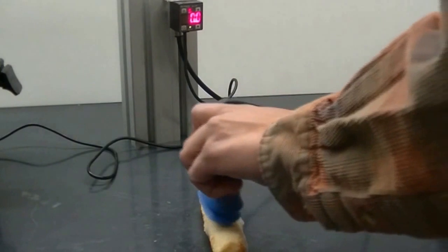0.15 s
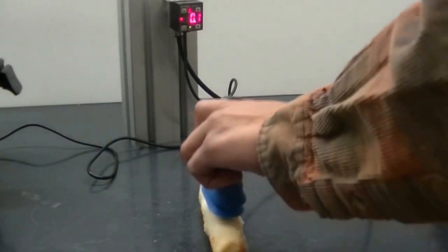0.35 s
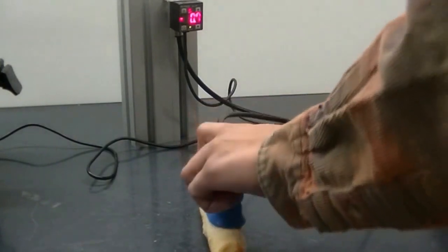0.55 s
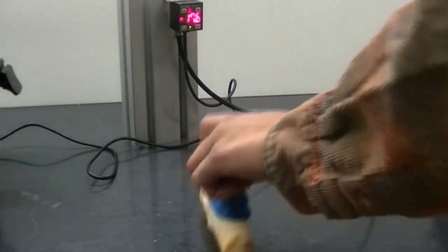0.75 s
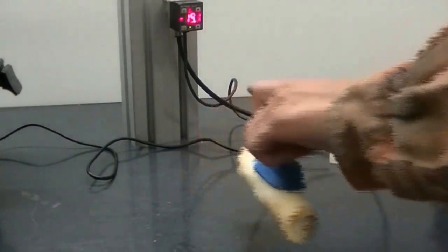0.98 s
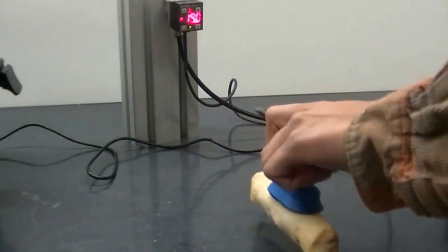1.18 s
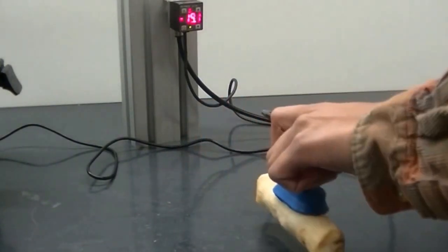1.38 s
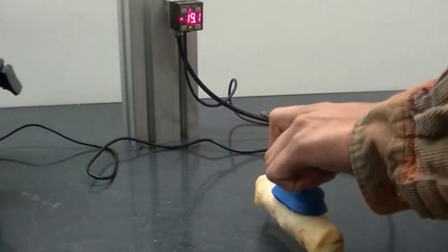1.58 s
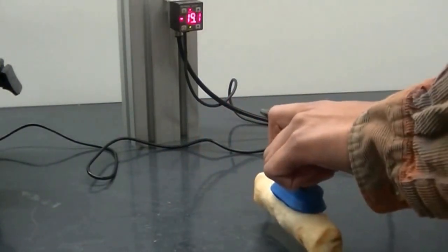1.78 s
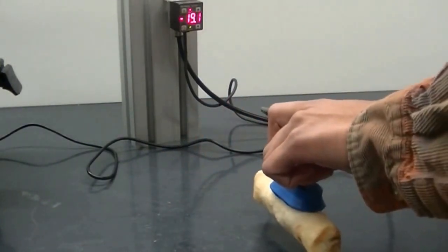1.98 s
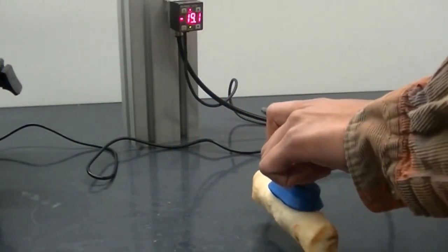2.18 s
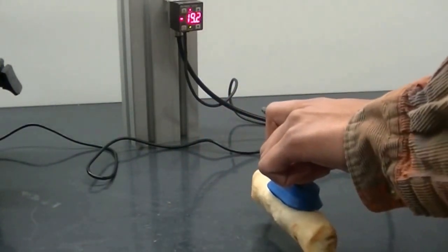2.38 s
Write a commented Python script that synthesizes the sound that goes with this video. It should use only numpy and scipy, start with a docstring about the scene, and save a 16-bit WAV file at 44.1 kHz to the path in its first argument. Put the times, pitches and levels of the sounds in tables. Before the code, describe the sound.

A loud hiss of compressed air from a vacuum ejector, heard close up. Faint electrical hum and ventilation come first; at about 0.25 seconds a valve snaps open and the bright hiss starts at once, covering the room. From 0.6 to 1.3 seconds its tone shifts as a suction cup grips and lifts food. It then holds steady, easing slightly, until the end at about 2.4 seconds.

```python
"""Mains hum and ventilation in a room, then a valve snaps open and a jet of compressed air hisses.
It is a vacuum ejector on a bench, close to a camera's stereo microphone. The exhaust jet's broad
resonances shift as a suction cup is pressed on a piece of food, then settle once it seals.
The camera's gain control ducks the room under the hiss."""
import sys
import numpy as np
from scipy import signal
from scipy.fft import rfft, irfft, next_fast_len
from scipy.io import wavfile
from scipy.ndimage import map_coordinates

SR = 44100
rng = np.random.default_rng(int(sys.argv[2]) if len(sys.argv) > 2 else 0)


def log_audio(samples):
    """Write samples as a 16-bit WAV file to the path given in sys.argv[1]."""
    # one column per channel
    frames = np.atleast_2d(samples).T
    # limit to full scale, then quantise
    limited = np.clip(frames, -1, 1)
    pcm = np.round(limited * 32767).astype(np.int16)
    wavfile.write(sys.argv[1], SR, pcm)


N = 107648

# Mains hum and faint machine tones: pitch_hz, level_db
HUM_TONES = [(120, -44.5), (1200, -67), (1922, -64), (2283, -68.5), (3004, -67), (3122, -72)]
# Ventilation noise all round the microphone: frequency_hz, relative_db
VENT_SPECTRUM = [(25, -11), (55, 0), (110, 2.5), (200, -6), (450, -6.5), (800, -12), (1300, -18.5),
                 (2500, -22), (6000, -28.5), (15000, -39.5)]
# Stereo width of the room: frequency_hz, side_gain_db
ROOM_WIDTH = [(60, -12), (200, -12), (1000, -7), (4000, -3), (10000, -2)]
VENT_DB = -47

# Blows of the opening valve: start_s, relative_db
VALVE_BLOWS = [(0.2507, -20), (0.2534, -7.5), (0.2547, -4), (0.2593, -1)]
# Modes of its housing: pitch_hz, nominal_width_hz, relative_db
HOUSING_MODES = [(862, 134, -11), (2140, 99, -10), (2676, 160, -0.5), (3440, 140, 1), (4200, 110, -7),
                 (5070, 120, -4), (6020, 120, 2), (6660, 120, 1), (7250, 120, -12)]
# Air let out by each blow: frequency_hz, relative_db
PUFF_SPECTRUM = [(40, -6), (150, -1.5), (450, -5.5), (850, -3), (1300, -17), (2700, -1), (6500, 1),
                 (9000, -17), (15000, -19)]
RING_DB, RING_WIDTH_SCALE = -5.5, 0.59
PUFF_DB, PUFF_T60_S = -3, 0.024

# Strength of the exhaust jet: time_s, level_db
JET_LEVEL = [(.25, -5), (.55, -6.5), (.76, -4), (.95, -5), (1.15, -7.5), (1.3, -8.5), (1.7, -8),
             (2.44, -11)]
# Its broad colour: frequency_hz, relative_db
JET_SPECTRUM = [(60, -27.5), (300, -18), (800, -14.5), (1400, -12), (2200, -6), (3400, -3), (5800, 0.5),
                (8500, -0.5), (11000, -4), (12000, -5), (15000, -5.5)]
# Shelf on its top treble: time_s, gain_db
TREBLE_SHELF = [(.25, 2), (.63, 2), (.7, -1.5), (.88, -3), (.95, -1.5), (1.2, -2), (1.3, -1), (2.44, -1.5)]
# Lower exhaust resonance: time_s, centre_hz, boost_db
LOW_RESONANCE = [(.25, 4500, 4.5), (.55, 4500, 4), (.67, 4800, 8.5), (.76, 4570, 12), (.9, 4670, 10),
                 (.97, 4570, 11), (1.08, 4100, 6), (1.2, 4160, 8), (1.28, 4390, 9), (1.7, 4400, 10),
                 (2.44, 4330, 8)]
# Upper exhaust resonance: time_s, centre_hz, width_hz, boost_db
HIGH_RESONANCE = [(.25, 9500, 1410, 9.5), (.57, 9500, 1380, 11), (.68, 8920, 960, 15), (.78, 8900, 876, 13),
                  (.91, 8500, 870, 15), (.96, 9560, 1000, 12.5), (1.03, 9350, 700, 11),
                  (1.15, 9200, 497, 8), (1.28, 9930, 554, 11.5), (2.44, 9930, 554, 11)]
# Resonances that hold their pitch: centre_hz, width_hz, cup_open_db, cup_sealed_db
BODY_RESONANCES = [(1350, 350, 4, -1), (1850, 150, 7, -1), (2030, 45, 0, 4), (2320, 60, 0, 3),
                   (3110, 100, 1, 7), (3460, 90, 1, -3), (4180, 40, 2, 3), (4850, 45, 2, 4),
                   (6550, 130, 3, 1), (7400, 380, 2, 6), (10950, 350, 4, 0), (13200, 480, 1, 9)]
# How far the cup has sealed: time_s, fraction
CUP_SEAL = [(.6, 0), (.8, 0.33), (1.18, 0.7), (1.29, 0.87), (1.8, 0.92)]
# Peaks and notches while the cup grips the food: centre_hz, width_hz, gain_db
GRIP_BANDS = [(2500, 270, 6.5), (3440, 200, -4.5), (5380, 220, 7.5), (5900, 180, 2), (6800, 270, 5),
              (10900, 420, -2.5)]
# Peaks and notches while the food is lifted: centre_hz, width_hz, gain_db
LIFT_BANDS = [(600, 300, 3), (3400, 190, -5), (4050, 140, 0.5), (4620, 170, -6), (5530, 360, 7.5),
              (7650, 280, -3), (13300, 400, -5), (15000, 500, 7)]
# Notches that deepen as the cup seals: centre_hz, width_hz, gain_db
SEAL_NOTCHES = [(2530, 93, -2), (5370, 150, -0.5), (8600, 240, -2.5), (12040, 260, -2.5), (14500, 400, -4)]
OPEN_S, RISE_S = .2525, 0.0049  # the air comes on and builds up
GRIP_S, GRIP_WIDTH_S = 0.74, 0.095
LIFT_S, LIFT_WIDTH_S = 1.135, 0.07
LULL_S, LULL_WIDTH_S, LULL_DB = 2.055, 0.01, -3.5  # the lower resonance dips briefly
LOW_WIDTH_HZ, TREBLE_HZ, TREBLE_EDGE_HZ = 482, 11200, 460
FLUTTER_DB, FLUTTER_PER_S = 1.1, 30  # each moving resonance swells and shrinks by chance
SPUTTER_DB, SPUTTER_PER_S = 0.3, 220  # fast unevenness of the whole jet

# Stereo width of the ejector, close up: frequency_hz, side_gain_db
EJECTOR_WIDTH = [(60, -5), (400, -8), (1200, -17), (2200, -31), (4300, -25), (6000, -20), (10000, -21),
                 (12500, -15.5), (15000, -18)]
# Balance of everything at the microphone: frequency_hz, left_over_right_db
MIC_BALANCE = [(100, 2.5), (400, 1.7), (1500, -0.1), (4000, 0.5), (7000, 0), (14000, 0.5)]
# Extra lean of the ejector until the cup is pressed: frequency_hz, left_over_right_db
OPEN_CUP_BALANCE = [(500, 1), (2000, 2.1), (4800, -1), (6500, 4.5), (9800, 4), (11200, -0.5), (13000, 5.5)]
PRESS_S, PRESS_FADE_S = 0.62, 0.028
ECHO_DB, ECHO_SPAN_S = -11, .02
THRESHOLD_DB, DUCK_DB_PER_DB, ATTACK_S, RELEASE_DB_PER_S = -27, .58, 0.0046, 5.5
CEILING, TOP_HZ, TOP_EDGE_HZ = .76, 15350, 45


def amp(db):
    """Decibels to gain."""
    return 10 ** (np.asarray(db) / 20)


def unit_rms(x):
    """x scaled to rms 1."""
    return x / np.sqrt(np.mean(x ** 2) + 1e-20)


def db_at(points, hz):
    """Points of frequency_hz, db read on a log frequency axis."""
    frequencies, db = np.transpose(points)
    return np.interp(np.log(hz + 1), np.log(frequencies + 1), db)


def curves(rows, t):
    """Each column after the time, read at times t."""
    times, *columns = np.transpose(rows)
    return [np.interp(t, times, column) for column in columns]


def wobble(knots_per_s, t):
    """A smooth random curve."""
    return map_coordinates(rng.standard_normal(size=2048), [t * knots_per_s], mode="wrap")


def bell(x, centre, width):
    """A Gaussian bump of height 1; width is its standard deviation."""
    return np.exp(-.5 * ((x - centre) / width) ** 2)


def step(x, centre, width):
    """A smooth rise from 0 to 1."""
    return (1 + np.tanh((x - centre) / width)) / 2


def filtered(x, response):
    """x through a gain that depends on frequency."""
    size = next_fast_len(N + SR // 2)
    return irfft(rfft(x, size) * response(np.fft.rfftfreq(size, 1 / SR)), size)[..., :N]


def noise(spectrum):
    """Two unrelated coloured noises (mid, side) of rms 1."""
    return unit_rms(filtered(rng.standard_normal((2, N)), lambda hz: amp(db_at(spectrum, hz))))


def left_right(mid, side, width):
    """Mid and side to left and right, the side scaled by a width table."""
    side = filtered(side, lambda hz: amp(db_at(width, hz)))
    return np.array([mid + side, mid - side])


def leaning(x, balance):
    """Left and right tipped by a balance table."""
    return filtered(x, lambda hz: amp(np.outer([.5, -.5], db_at(balance, hz))))


def room_tone(t):
    """Mains hum and machine tones in the centre of diffuse ventilation noise (left, right)."""
    mid, side = amp(VENT_DB) * noise(VENT_SPECTRUM)
    hum = np.sqrt(2) * sum(amp(db) * np.sin(2 * np.pi * (hz * t + rng.random())) for hz, db in HUM_TONES)
    return left_right(mid + hum, side, ROOM_WIDTH)


def with_echoes(x, count=12):
    """Weak echoes off the bench and wall reach the microphone just after the direct sound."""
    delays_s = ECHO_SPAN_S * rng.uniform(.1, 1, count)
    taps = np.bincount((delays_s * SR).astype(int), rng.standard_normal(count))
    taps /= np.linalg.norm(taps)
    return x + amp(ECHO_DB) * signal.fftconvolve(x, taps[None], axes=1)[:, :N]


def valve_snap(t):
    """The valve opens in a few quick blows; each rings its housing and lets out a puff (mid, side)."""
    snap = np.zeros((2, N))
    for start_s, blow_db in VALVE_BLOWS:
        age = np.maximum(t - start_s, 0)
        for hz, width, mode_db in HOUSING_MODES:
            strength = amp(blow_db + RING_DB + mode_db + rng.normal(0, 1.6))
            decay = np.exp(-np.pi * RING_WIDTH_SCALE * width * age)
            snap[0] += strength * decay * np.sin(2 * np.pi * hz * age + rng.choice([0, np.pi]))
        puff_envelope = amp(blow_db + PUFF_DB - 60 * age / PUFF_T60_S) * (age > 0)
        snap += puff_envelope * noise(PUFF_SPECTRUM)
    return snap


def exhaust_colour(hz, t):
    """The jet's spectrum in dB, with a treble shelf and two wandering, fluttering resonances."""
    treble_db, = curves(TREBLE_SHELF, t)
    low_hz, low_db = curves(LOW_RESONANCE, t)
    high_hz, high_width, high_db = curves(HIGH_RESONANCE, t)
    low_db += LULL_DB * bell(t, LULL_S, LULL_WIDTH_S)
    low = (low_db + FLUTTER_DB * wobble(FLUTTER_PER_S, t)) * bell(hz, low_hz, LOW_WIDTH_HZ)
    high = (high_db + FLUTTER_DB * wobble(FLUTTER_PER_S, t)) * bell(hz, high_hz, high_width)
    return db_at(JET_SPECTRUM, hz) + treble_db * step(hz, TREBLE_HZ, TREBLE_EDGE_HZ) + low + high


def cup_colour(hz, t):
    """Peaks and notches in dB that come and go as the cup grips, lifts and seals on the food."""
    def bands(table):
        return sum(db * bell(hz, centre, width) for centre, width, db in table)

    seal, = curves(CUP_SEAL, t)
    body = sum((open_db + seal * (sealed_db - open_db)) * bell(hz, centre, width)
               for centre, width, open_db, sealed_db in BODY_RESONANCES)
    grip = bell(t, GRIP_S, GRIP_WIDTH_S) * bands(GRIP_BANDS)
    lift = bell(t, LIFT_S, LIFT_WIDTH_S) * bands(LIFT_BANDS)
    return body + grip + lift + seal * bands(SEAL_NOTCHES)


def exhaust_jet(t):
    """Turbulent air hisses through the shifting resonances once the valve opens (mid, side)."""
    hz, frame_s, turbulence = signal.stft(rng.standard_normal((2, N)), SR, nperseg=512)
    colour = amp(exhaust_colour(hz[:, None], frame_s) + cup_colour(hz[:, None], frame_s))
    colour /= np.linalg.norm(colour, axis=0)  # the colour moves at constant power
    hiss = unit_rms(signal.istft(turbulence * colour, SR)[1][:, :N])
    level_db, = curves(JET_LEVEL, t)
    opening = 1 - np.exp(-np.maximum(t - OPEN_S, 0) / RISE_S)
    return hiss * opening * amp(level_db + SPUTTER_DB * wobble(SPUTTER_PER_S, t))


def scene():
    """The ejector, close and narrow in a wide room; its treble leans left until the cup is pressed."""
    t = np.arange(N) / SR
    mid, side = with_echoes(exhaust_jet(t) + valve_snap(t))
    ejector = left_right(mid, side, EJECTOR_WIDTH)
    pressed = step(t, PRESS_S, PRESS_FADE_S)
    ejector = pressed * ejector + (1 - pressed) * leaning(ejector, OPEN_CUP_BALANCE)
    return leaning(room_tone(t) + ejector, MIC_BALANCE)


def record(dry):
    """The camera's gain control ducks fast and recovers slowly; soft clipping and a low-pass follow."""
    def smooth(x):
        pole = np.exp(-1 / (ATTACK_S * SR))
        return signal.lfilter([1 - pole], [1, -pole], x)

    level_db = 10 * np.log10(smooth(np.mean(dry ** 2, axis=0)) + 1e-12)
    wanted_duck_db = DUCK_DB_PER_DB * np.maximum(level_db - THRESHOLD_DB, 0)
    recovery_db = RELEASE_DB_PER_S * np.arange(N) / SR
    duck_db = np.maximum.accumulate(wanted_duck_db + recovery_db) - recovery_db
    ducked = dry * amp(-smooth(duck_db))
    clipped = ducked / (1 + (ducked / CEILING) ** 6) ** (1 / 6)
    return filtered(clipped, lambda hz: 1 - step(hz, TOP_HZ, TOP_EDGE_HZ))


dry = scene()
out = record(dry)
log_audio(out)
```